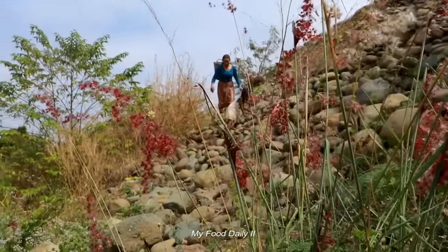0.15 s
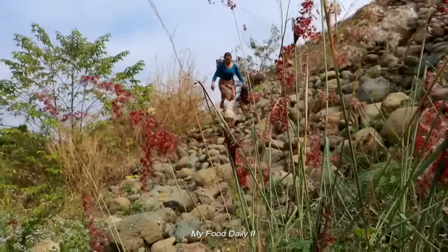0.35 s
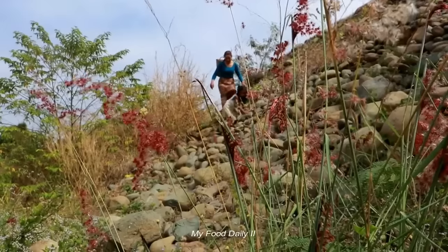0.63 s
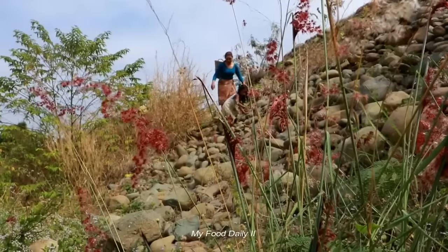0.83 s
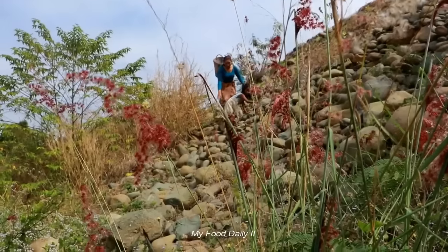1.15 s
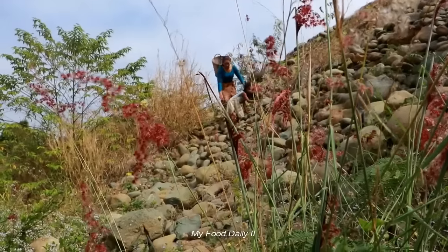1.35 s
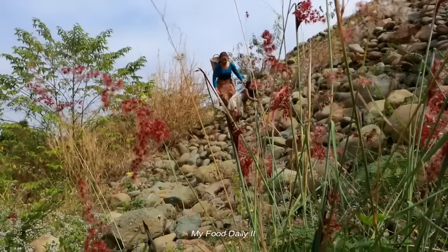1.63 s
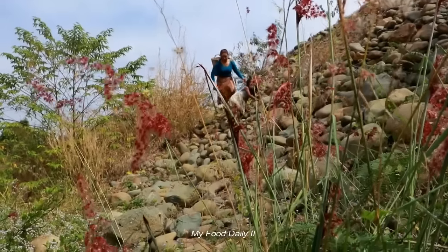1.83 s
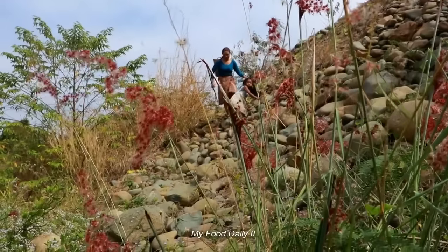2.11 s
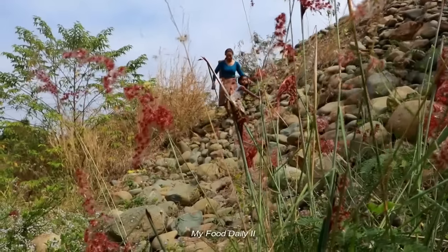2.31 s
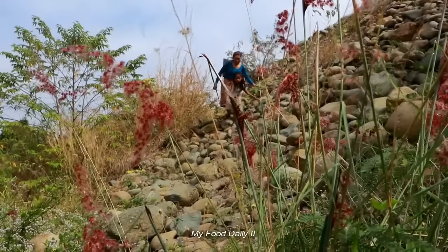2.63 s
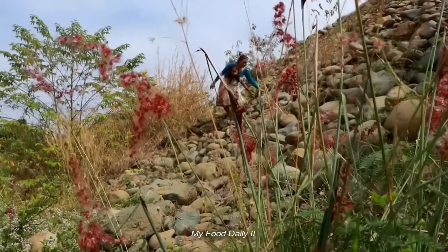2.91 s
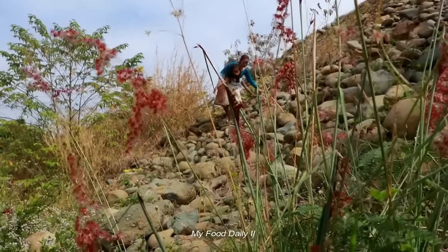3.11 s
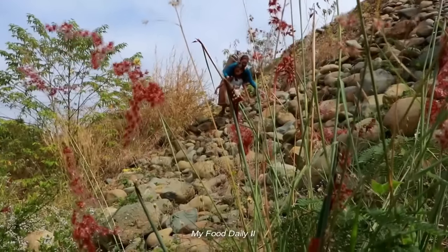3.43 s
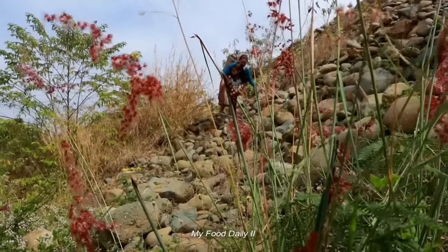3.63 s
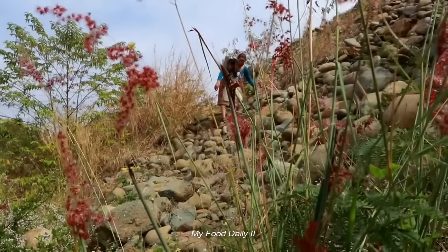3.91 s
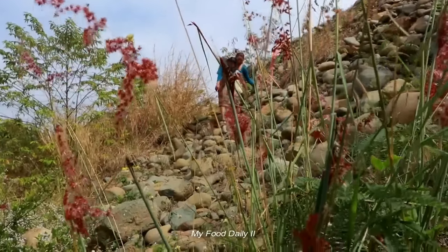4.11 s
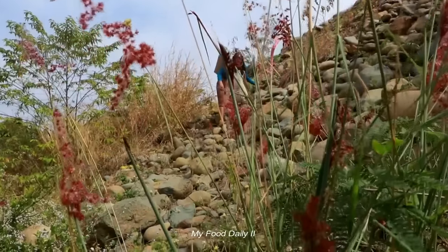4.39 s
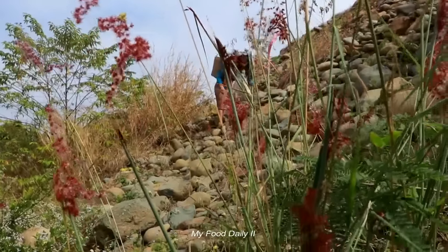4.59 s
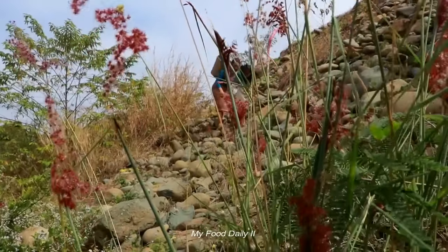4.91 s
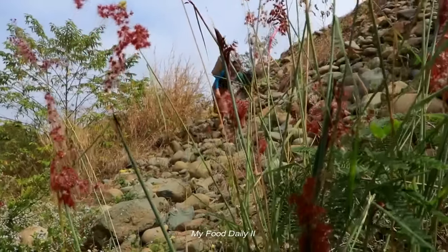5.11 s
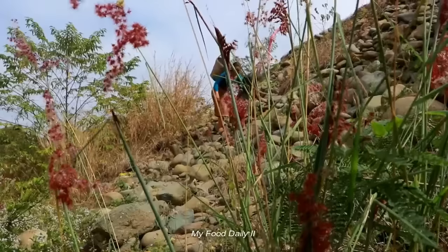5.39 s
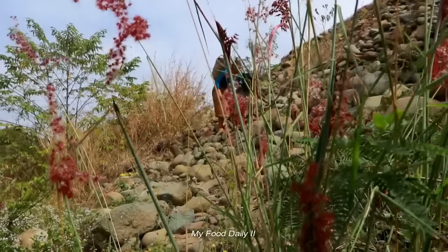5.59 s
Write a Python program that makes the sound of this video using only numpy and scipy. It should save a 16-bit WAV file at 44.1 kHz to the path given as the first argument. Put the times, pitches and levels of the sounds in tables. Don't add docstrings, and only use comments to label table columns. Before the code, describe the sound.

Outdoors on a stony slope, a cricket trills over a faint engine hum and airy rush. Soft steps knock stones, snap dry stems and a strap squeaks. After a lull with swishing grass and bird whistles, a stumble cracks stones loudly together near three seconds, then quieter steps, gravel crunches and more knocks follow. The stones sound dry and clear, with only a short scattered echo and light microphone hiss.

```python
import sys
import numpy as np
from scipy import signal
from scipy.fft import rfft, irfft, next_fast_len
from scipy.io import wavfile
from scipy.ndimage import map_coordinates

SR = 44100
rng = np.random.default_rng(int(sys.argv[2]) if len(sys.argv) > 2 else 0)


def bounce(signal):
    frames = np.transpose(np.atleast_2d(signal))
    limited = np.clip(frames, -1, 1)
    pcm = np.round(limited * 32767).astype(np.int16)
    wavfile.write(sys.argv[1], SR, pcm)


def undo_db(level):
    steps = np.asarray(level, float) / 20
    return 10 ** steps


N = 253575
T = np.arange(N) / SR


def unit(x):
    return x / np.sqrt(np.mean(x ** 2) + 1e-20)


def curves(rows):
    s, *columns = np.transpose(rows)
    return [np.interp(T, s, column) for column in columns]


def wobble(rate, size=N):
    knots = rng.standard_normal(int(size * rate / SR) + 4)
    return map_coordinates(knots, [T[:size] * rate])


def coloured(x, points):
    f, db = np.transpose(points)
    m = next_fast_len(N + 8192)
    log_hz = np.log(np.fft.rfftfreq(m, 1 / SR) + 1)
    gain = undo_db(np.interp(log_hz, np.log(f + 1), db))
    return unit(irfft(rfft(x, m) * gain, m)[:N])


def ring(hz, t60, t):
    return np.sin(2 * np.pi * np.minimum(hz, 20000) * t) * undo_db(-60 * t / t60)


def resonate(x, hz, width_hz):
    f = np.fft.rfftfreq(8192, 1 / SR)
    response = 1j * f * width_hz / (hz * hz - f * f + 1j * f * width_hz)
    y = irfft(rfft(x, 8192) * response ** 2)[:4096]
    return y / np.abs(y).max()


def add(track, s, x):
    part = track[round(s * SR):][:len(x)]
    part += x[:len(part)]


def echoes(x, db, t60):
    t = np.arange(SR // 8) / SR
    slope = rng.standard_normal(len(t)) * undo_db(-60 * t / t60)
    return x + undo_db(db) * signal.fftconvolve(x, slope / np.linalg.norm(slope))[:N]


def contacts(u, spread_s, dense, lead=0.48):
    v = np.arange(u.shape[1]) / SR / max(spread_s, 1e-4)
    touches = (u[0] < dense) * (2 * u[1] - 1)
    swell = np.minimum(0.47 + 2 * v, 1)
    return touches * swell * np.exp(-v * np.sqrt(v)) + lead * (v == 0)


def strokes(rows):
    fade_db = 9
    return np.sqrt(sum(undo_db(db - fade_db * np.abs(T - s) / half) ** 2 for s, half, db in rows))


def grit(per_s, spread_db, clump_db, bed):
    hits = (rng.random(N) < per_s / SR) * rng.choice([-1, 1], N) * undo_db(spread_db * rng.random(N))
    clumps = undo_db(clump_db * np.tanh(wobble(60)))
    return unit(hits) * clumps + bed * rng.standard_normal(N)


def whistle(rows, flutter_db, waver_hz, partials, ripple=0):
    ripple_per_s, ripple_hz, ripple_db = 29, 140, 1.5
    s, hz, db = np.transpose(rows)
    t = np.arange(s[0], s[-1], 1 / SR)
    gate = np.clip(np.minimum(t - s[0], s[-1] - t) / 0.0031, 0, 1)
    sag = ripple * (.5 - (ripple_per_s * (t - s[0] - .023).clip(0)) % 1)
    pitch = np.interp(t, s, hz) + ripple_hz * sag + waver_hz * wobble(109.5, size=len(t))
    phase = 2 * np.pi * np.cumsum(pitch) / SR
    flutter = flutter_db * wobble(140.6, size=len(t))
    level = gate * undo_db(np.interp(t, s, db) + 6.0 + ripple_db * sag + flutter)
    out = np.zeros(N)
    add(out, s[0], level * sum(undo_db(g_db) * np.sin(k * phase) for k, g_db in partials))
    return out


def notes(songs):
    return [[(s + a * length, hz + b * (turn_hz - hz), db + c) for a, b, c in shape]
            for shape, rows in songs for s, length, hz, turn_hz, db in rows]


def valley():
    # time in seconds, pitch in Hz, level in dB.
    engine = [(0.0, 82, -54), (1.47, 85, -57.5), (1.9, 78, -49.5), (2.3, 82.3, -53.5), (2.55, 71.5, -52),
              (2.7, 72, -48), (2.93, 75, -55), (3.12, 81, -50.5), (4.55, 82.5, -49.5), (5.14, 81.6, -50.5),
              (5.75, 78.3, -50)]
    # frequency in Hz, level in dB per Hz.
    rumble_colour = [(14, -24), (24, -9), (34, -8), (50, -5.5), (85, -7), (120, -9), (177, -6), (230, -15),
                     (400, -21.5), (600, -42)]
    air_colour = [(150, -54), (250, -4), (460, -0.5), (1160, -5.5), (1420, -2), (1730, -6.5), (3650, -11),
                  (5250, -14.5), (6140, -8), (6820, -12), (9300, -14.5), (10300, -17.5), (16000, -19)]
    hz, db = curves(engine)
    phase = 2 * np.pi * np.cumsum(hz + 1.8 * wobble(17)) / SR
    octave = undo_db(-17.0 + 4.5 * wobble(6)) * np.sin(2 * phase)
    hum = undo_db(db + 2.0 + 1.5 * wobble(8.6)) * (np.sin(phase) + octave)
    rumble = undo_db(-51.5 + wobble(1.71)) * coloured(rng.standard_normal(N), rumble_colour)
    air = undo_db(-55.0 + 0.78 * wobble(1.28)) * coloured(rng.standard_normal(N), air_colour)
    return hum + rumble + air


def cricket():
    # time in seconds, level in dB, lead of the stroke in cycles, pitch shift in Hz,
    # low end of the stroke against its start in dB.
    trill = [(0, -60.5, -0.39, 0, 0), (0.64, -58.5, -0.46, 0.5, -1), (0.67, -98, -0.47, 2, 0),
             (1.75, -99, -0.47, -300, 0), (1.8, -64, -0.5, -300, 0), (1.95, -67, -0.51, -200, 1),
             (2.2, -58, -0.38, -120, -2), (2.9, -57, -0.35, -20, -4), (3.2, -58.5, -0.31, -0.5, -4.5),
             (4.1, -57.5, -0.28, 0.5, -5), (4.5, -60, -0.18, 20, -8), (4.9, -58, -0.24, 20, -6),
             (5.7, -60.5, -0.32, 25.5, -4)]
    strokes_hz = 41.5
    db, lead, shift, low_db = curves(trill)
    u = (strokes_hz * T + lead + .4) % 1 - .4

    def bump(at, width):
        return np.exp(-.5 * ((u - at) / width) ** 2)

    def tone(hz):
        return np.sin(2 * np.pi * np.cumsum(hz + shift + 20 * wobble(150)) / SR)

    swell = bump(-0.12, .11) + undo_db(low_db + wobble(30)) * bump(0.14, 0.094)
    stroke = swell * tone(6800 - 190 * np.tanh((u - .01) / 0.12))
    answer = 0.33 * bump(0.22, 0.12) * tone(6900)
    near = echoes(undo_db(db + 11 + wobble(45)) * (stroke + answer), -11, .03)
    far = coloured(rng.standard_normal(N), [(5400, -47), (5900, -9), (6200, -2), (6700, -42)])
    blur = coloured(rng.standard_normal(N), [(6200, -45), (6600, 2), (6950, -3), (7300, -48)])
    return near + undo_db(db - 4.0) * blur + undo_db(-73) * far


def birds():
    # share of the length, share of the way from first to turning pitch, level in dB.
    glide = [(0, 0.044, -1), (.3, 0.16, 4), (.8, .82, 3.5), (1, 0.97, -3)]
    swing = [(0, 0, 4), (.35, .82, 2), (.5, 0.99, 1.5), (.65, .78, 2.3), (1, -.1, 2)]
    hook = [(0, 0, -9), (.07, 0.48, -8.5), (.14, 0.656, -8), (.165, .96, -2), (.75, .72, -2.5),
            (.92, .58, -7.5), (1, .3, -8)]
    dip = [(0, 0.051, 1), (.35, .7, 3), (.6, 0.96, 3), (1, .85, -7)]
    arch = [(0, 0, -2), (.2, .35, 2), (.55, .72, 3), (1, 1, -2)]
    # start in seconds,
    # length in seconds, first pitch in Hz, turning pitch in Hz, level in dB.
    glide_notes = [(0.16, 0.17, 1716, 2650, -63), (0.49, 0.041, 9440, 9150, -57.5),
                   (0.503, 0.06, 6750, 7550, -61), (0.764, 0.095, 4490, 4200, -60.5),
                   (1.549, 0.09, 3200, 3500, -62), (1.668, 0.054, 3210, 3600, -62),
                   (1.787, 0.053, 6200, 7050, -58.5), (3.292, 0.069, 3360, 3500, -60.5),
                   (3.711, 0.037, 4270, 3330, -62), (5.335, .035, 4100, 3020, -65),
                   (5.43, .05, 7000, 7700, -66)]
    swing_notes = [
        (1.33, 0.24, 3570, 3730, -68.5),
        (3.55, 0.22, 6720, 5160, -59.5),
        (3.752, .058, 3420, 3720, -62),
        (5.29, 0.21, 6760, 5200, -60.5),
    ]
    hook_notes = [
        (2.137, 0.14, 3660, 4560, -45.5),
        (3.35, 0.14, 3500, 4570, -45),
        (4.154, 0.16, 3690, 4530, -47.5),
        (5.515, 0.15, 3655, 4415, -47),
    ]
    dip_notes = [
        (.29, .13, 6650, 5850, -58.5),
        (1.66, .155, 6670, 5600, -56),
    ]
    arch_notes = [
        (.9, .125, 4350, 5850, -61),
        (3.147, .125, 4450, 5950, -62.5),
        (3.6, .06, 4350, 4150, -68),
        (4.265, .025, 2950, 3150, -62),
    ]
    near_songs = notes([(hook, hook_notes)])
    far_songs = notes([(glide, glide_notes), (swing, swing_notes), (dip, dip_notes), (arch, arch_notes)])
    near = sum(whistle(rows, 1.8, 30, [(1, -2)], ripple=1) for rows in near_songs)
    far = sum(whistle(rows, 2, 26, [(1, -5)]) for rows in far_songs)
    echo_s, echo_db = .036, -10
    far = far + undo_db(echo_db) * np.roll(far, round(echo_s * SR))
    return echoes(near, -6, .14) + echoes(far, -4, .12)


def basket():
    # time in seconds, pitch of the high partial in Hz, level in dB.
    squeaks = [
        [(0.49, 15818, -73), (0.502, 15701, -55), (0.572, 15236, -59), (0.632, 15200, -59), (0.64, 15050, -58),
         (0.704, 15100, -59), (0.94, 14771, -67)],
        [(5.41, 15500, -73), (5.42, 15300, -56), (5.542, 15100, -63), (5.545, 15080, -71)],
    ]
    # start in seconds, pitch in Hz, level in dB, time to die by 60 dB in seconds.
    clinks = [(.492, 4430, -46, 0.091), (.56, 7700, -47, 0.1), (.58, 7750, -48, .05), (.64, 7700, -48, .07),
              (4.361, 7600, -46, 0.097), (4.797, 11840, -49, 0.064), (4.843, 8900, -42, 0.06),
              (4.855, 8900, -34, 0.05), (5.056, 8970, -39.5, 0.045), (5.04, 8950, -52, .05),
              (5.41, 4380, -49, 0.81), (5.475, 7630, -51.5, 0.075)]
    out = sum(whistle(rows, 4, 45, [(1, -2), (3 / 4, -15)]) for rows in squeaks)
    t = np.arange(SR // 8) / SR
    ends = (1 - np.exp(-t / 0.00082)) * np.clip((t[-1] - t) / 0.021, 0, 1)
    for s, hz, db, t60 in clinks:
        add(out, s, undo_db(db + 3.1 * wobble(200, size=len(t))) * ring(hz, t60, t) * ends)
    return out


def scraping():
    # pitch in Hz, level in dB.
    sizes = [(200, -3), (370, -3), (700, -3), (1100, -2), (1600, -7.5)]
    # time of most weight in seconds, half length in seconds,
    # grinding level in dB, fine grit against it in dB.
    treads = [(0.01, 0.24, -56, -2.5), (0.463, 0.079, -56.5, -17), (0.87, 0.15, -56, 1),
              (1.407, 0.4, -65.5, 0), (2.025, 0.13, -55, -6), (2.306, 0.15, -58, -2),
              (2.46, 0.051, -67.5, 13), (2.666, 0.085, -48, -6.5), (2.872, 0.14, -47, -6),
              (3.206, 0.45, -63.5, -3), (3.52, 0.19, -59.5, -8.5), (3.904, 0.12, -57.5, -8),
              (4.066, 0.075, -46, -17), (4.18, 0.049, -49, -4), (4.384, 0.15, -47, -9.5),
              (4.8, 0.14, -51.5, -3.5), (5.076, 0.063, -51.5, -7), (5.337, 0.091, -55.5, -8),
              (5.75, 0.19, -54.5, -8)]
    # middle in seconds, half length in seconds, level in dB.
    swishes = [(.13, 0.25, -59), (.76, 0.21, -56.5), (1.7, 0.1, -54.5), (1.95, 0.19, -61),
               (2.2, 0.23, -58.5), (2.51, 0.19, -55), (2.88, 0.16, -52.5), (3.36, 0.14, -61),
               (3.85, 0.14, -67), (4.3, 0.34, -65.5), (5.5, .25, -66)]
    # frequency in Hz, level in dB per Hz.
    grass_colour = [(2650, -29), (4500, -5), (6300, -5), (8700, 0), (9500, -4.5), (10400, -12.5),
                    (14500, -8), (16000, -25)]
    weight = strokes([(s, half, db) for s, half, db, _ in treads])
    crush = strokes([(s, half, db + grit_db) for s, half, db, grit_db in treads])

    def stone(hz):
        colour = [(hz / 2, -30), (hz / 1.3, -4), (hz, 0), (hz * 1.3, -4), (hz * 2, -30), (hz * 8, -70)]
        return coloured(grit(500, 12, 5, bed=.5), colour)

    grind = unit(sum(undo_db(db) * stone(hz) for hz, db in sizes))
    fine_colour = [(1200, -24), (1900, -7.5), (2800, -6.5), (4000, -9.5), (6000, -16.5), (16000, -31)]
    fine = crush * coloured(grit(2000, 6, 3.5, bed=0.52), fine_colour)
    brush = strokes(swishes) * coloured(grit(1200, 8.8, 7.6, bed=0.66), grass_colour)
    return undo_db(3.5) * (weight * grind + fine + brush)


def snaps():
    # start in seconds, peak level in dB, colour in Hz, level of the lower crack in dB.
    breaks = [(0.0383, -44, 7970, -56), (0.1575, -39, 8070, -57), (0.4943, -37, 9480, -57),
              (1.746, -38, 9790, -45), (2.0976, -41, 8560, -58), (2.1306, -46, 7970, -39),
              (2.1666, -45, 8460, -40.5), (2.196, -40.5, 8660, -36), (2.2467, -27.5, 11100, -24),
              (2.436, -28, 5430, -35), (2.559, -49, 7500, -53), (2.585, -25, 11500, -28),
              (2.614, -27, 12600, -48), (2.7771, -33, 9280, -48), (2.9148, -48, 7790, -57),
              (2.9427, -40, 7930, -54), (2.995, -19, 9000, -44), (3.042, -41, 8520, -34),
              (3.2797, -29.5, 13000, -31.5), (3.3453, -28.5, 8240, -60), (3.8347, -43, 8050, -59),
              (3.8606, -37, 7600, -61), (3.894, -36, 9100, -54), (4.1579, -45, 7640, -57),
              (4.766, -39, 9000, -47), (4.842, -33, 8940, -34), (4.924, -41, 8900, -59),
              (5.0574, -41, 8990, -58)]
    out = np.zeros(N)
    for (s, db, hz, low_db), u in zip(breaks, rng.random((len(breaks), 2, 1024))):
        crackle = contacts(u, 0.0035, dense=0.4) + (T[:1024] == 0)
        bright = undo_db(db - 5.0) * resonate(crackle, hz, 0.36 * hz)
        low = undo_db(low_db - 2.5) * resonate(crackle, 3770, 4800)
        add(out, s - .0004, bright + low)
    return out


def gravel():
    # start in seconds, peak level in dB, colour in Hz.
    grains = [(2.599, -33, 1030), (2.617, -27, 900), (2.631, -39, 695), (2.654, -37, 1400),
              (2.671, -41, 1530), (2.686, -39, 1400), (2.711, -38, 1400), (2.835, -31, 1130),
              (2.901, -33, 1350), (2.911, -35, 1300), (2.938, -42, 1040), (2.957, -40, 662),
              (3.007, -17.5, 1250), (4.044, -40, 947), (4.061, -35, 729), (4.104, -38, 681),
              (4.154, -39, 1200), (4.171, -39, 929), (4.207, -40, 834), (4.255, -42, 1030),
              (4.304, -39, 1030), (4.374, -40, 1130), (4.399, -36, 1350), (4.411, -39, 1100),
              (4.425, -36, 1110), (4.436, -35, 1100), (4.447, -36, 1040), (4.471, -45, 1300),
              (5.11, -42, 573), (5.297, -37, 1440), (5.364, -38, 807)]
    # start in seconds, peak level in dB, colour in Hz.
    cracks = [(.671, -34, 1500), (.91, -34, 1500), (2.4342, -27, 2600), (2.8275, -28, 1700),
              (2.8712, -16.5, 1500), (3.0026, -10, 2600), (4.088, -21, 1250), (4.2945, -37, 1100),
              (4.329, -18, 1190), (4.8005, -21, 1700), (4.966, -35, 1000), (5.0605, -29.5, 1000)]
    out = np.zeros(N)
    for rows, wide in (grains, .45), (cracks, 1.5):
        for (s, db, hz), u in zip(rows, rng.random((len(rows), 2, 512))):
            cushion = np.hanning(round(.55 * SR / hz))
            blow = np.convolve(contacts(u, .0012, dense=.05, lead=1.6), cushion)
            add(out, s - .0003, undo_db(db - 4) * resonate(blow, hz, wide * hz))
    return out


def pebbles():
    # start in seconds, peak level in dB, pitch in Hz, swell in seconds,
    # time to die by 60 dB in seconds.
    pings = [(.669, -24.5, 1355, 0.0025, 0.018), (.678, -39, 1410, 0.0018, 0.037),
             (.685, -32.5, 1390, .003, .025), (0.6942, -33, 1300, 0.0019, 0.051),
             (2.4345, -30.5, 3870, 0.00092, 0.018), (2.434, -36, 3190, 0.00092, 0.03),
             (2.589, -29, 3180, .002, 0.023), (2.59, -38, 4270, .001, .02),
             (2.869, -23, 804, 0.0009, 0.022), (2.869, -28, 2800, .0005, .015),
             (3.004, -33, 4340, .0005, 0.036), (4.33, -25.5, 730, 0.0009, 0.037),
             (4.799, -26, 1950, 0.00078, 0.018), (2.579, -39.5, 174.4, 0.043, 0.51),
             (2.872, -18.5, 1412, 0.0016, 0.052), (3.0025, -23, 1910, 0.00048, 0.019),
             (3.0025, -21, 2770, 0.00044, 0.019), (3.0025, -17.5, 3650, 0.00063, 0.018),
             (3.035, -42, 1200, 0.0018, 0.032), (4.18, -44, 2490, .002, .03),
             (4.80, -27.5, 323, .002, 0.11), (4.803, -33, 2410, .002, .03), (4.843, -33, 209, .003, 0.085),
             (4.848, -36, 3490, .001, 0.017)]
    out, t = np.zeros(N), T[:SR // 3]
    for s, db, hz, swell_s, t60 in pings:
        swell = 1 - np.exp(-(t / max(swell_s, 1e-4)) ** 2)
        shape = ring(hz, t60, t) * swell * undo_db(1.3 * wobble(218, size=len(t)))
        add(out, s, undo_db(db) * shape / np.abs(shape).max())
    return out


def slides():
    # start in seconds, length in seconds, colour in Hz, level in dB, width over colour.
    slips = [(.672, 0.038, 790, -50, 0.57), (.965, 0.056, 2700, -54.5, 0.23),
             (.99, 0.065, 2080, -58.5, .25), (2.595, 0.026, 860, -41.5, 1), (2.982, 0.0187, 2600, -39.5, 1),
             (5.068, 0.007, 1840, -43, .6), (4.395, 0.069, 1080, -47, 0.37), (3.8, 0.086, 4100, -66, 0.74),
             (4.793, 0.03, 690, -40.5, 1), (4.846, .016, 810, -40, 1), (4.58, .04, 2600, -58, .5),
             (2.645, 0.087, 1450, -50, .6), (3.6, 0.043, 2500, -62.5, 0.76)]
    out = np.zeros(N)
    for s, length, hz, db, wide in slips:
        stroke = np.sin(np.pi * np.clip(T[:4000] / length, 0, 1)) ** .5
        rough = rng.standard_normal(4000) * stroke * undo_db(3 * wobble(150, size=4000))
        add(out, s, undo_db(db + 13.0) * resonate(rough, hz, wide * hz))
    return out


def knocks():
    # start in seconds, peak level in dB, ring in Hz, chip level in dB,
    # time to die by 60 dB in seconds.
    loose = [(0.094, -29.5, 1420, -54, 0.029), (0.670, -36, 1010, -39, 0.03), (0.937, -39, 1940, -49, .018),
             (2.4348, -25, 1840, -28, 0.016), (2.591, -25, 3160, -25.5, 0.028),
             (2.828, -25, 1074, -50, 0.066), (2.8692, -13.5, 1400, -37, 0.015),
             (2.8714, -8, 1380, -50, 0.022), (3.0026, -12.5, 1430, -14.5, 0.025),
             (3.026, -23.5, 1320, -30, 0.036), (3.871, -32.5, 1110, -53, 0.035),
             (4.33, -23, 870, -48, 0.014), (4.893, -32.5, 1170, -56, 0.03), (4.965, -35, 925, -61, 0.035),
             (4.989, -34.5, 1080, -64, 0.025), (5.411, -31.5, 1860, -35, 0.022)]
    # start in seconds, peak level in dB, ring in Hz, chip level in dB.
    bedded = [(0.492, -31, 1910, -37), (0.804, -47, 1210, -52), (0.826, -35.5, 740, -38),
              (0.832, -39, 1130, -55), (0.891, -34, 1930, -35.5), (0.909, -29, 1790, -42),
              (0.913, -31.5, 1060, -48), (2.359, -42, 697, -53), (2.559, -44, 1100, -39),
              (2.61, -29.5, 1040, -44), (2.70, -36.5, 1210, -48), (2.767, -34.5, 1030, -58),
              (2.808, -40, 1900, -44.5), (2.889, -29, 1460, -33), (2.9932, -27, 1360, -34),
              (3.199, -45, 1370, -57), (3.961, -30, 1060, -66), (4.077, -35, 950, -60),
              (4.088, -26, 1420, -56), (4.296, -33, 1090, -55), (4.195, -36, 1310, -52),
              (4.342, -31, 1100, -55), (4.354, -37, 1300, -52), (4.46, -37, 1320, -59),
              (4.685, -42, 1300, -52), (4.762, -36, 1130, -40), (4.799, -17, 1410, -26.5),
              (4.840, -33, 1300, -42), (4.843, -21.5, 1090, -28.5), (4.886, -33.5, 1480, -43),
              (5.056, -34, 905, -55), (5.06, -26.5, 930, -37.5), (5.291, -33.5, 1080, -59),
              (5.339, -35.5, 1040, -51), (5.355, -33.5, 1790, -44), (5.541, -39, 1940, -43)]
    # start in seconds, peak level in dB, ring in Hz, chip level in dB.
    heels = [
        (0.957, -39, 2450, -37.5),
        (2.297, -44, 805, -56),
        (3.443, -43, 1310, -45),
        (4.143, -44, 1040, -52),
        (4.165, -39.5, 921, -48),
    ]
    loose_thud_db, bedded_thud_db, heel_thud_db = -26.5, -13, -1
    bedded_t60_s = 0.032
    rows = [(*row, loose_thud_db) for row in loose]
    rows += [(*row, bedded_t60_s, bedded_thud_db) for row in bedded]
    rows += [(*row, bedded_t60_s, heel_thud_db) for row in heels]
    return sorted((s, db, hz, db + thud_db, chip_db, t60) for s, db, hz, chip_db, t60, thud_db in rows)


def stones():
    out = np.zeros(N)
    blow_list = knocks()
    for (s, db, hz, thud_db, chip_db, t60), u in zip(blow_list, rng.random((len(blow_list), 2, 2048))):
        t60 = np.clip(t60, .006, .12)
        hit = contacts(u, 0.091 * t60, dense=0.13, lead=2.14)
        rattle = 0.18 * contacts(u[:, ::-1], 0.64 * t60, dense=.15)
        blows = np.convolve(hit + rattle, np.hanning(20))
        body = 0.45 * resonate(blows, hz, 9 / t60) + 0.14 * resonate(blows, 1.28 * hz, 9 / t60)
        body = body + 0.87 * resonate(blows, 0.9 * hz, 1.0 * hz)
        thud = resonate(blows, 268, 197)
        edge = contacts(u[::-1], 0.24 * t60, dense=.25, lead=1.6)
        chip = resonate(np.convolve(edge, np.hanning(11)), 2790, 1930)
        add(out, s - .0006, undo_db(db + 1.5) * body + undo_db(thud_db + 6.0) * thud + undo_db(chip_db) * chip)
    return out


def scene():
    mono = valley() + cricket() + birds() + basket() + scraping() + snaps()
    mono = mono + gravel() + gravel()
    mono = mono + pebbles() + slides() + stones()
    return np.array([mono, mono])


def top_cut(x):
    return signal.sosfilt(signal.butter(12, 16660, fs=SR, output="sos"), x)


def record(dry):
    # frequency in Hz, level in dB per Hz.
    hiss_colour = [(25, -8), (59, -18), (100, -6), (381, -3.5), (452, -3), (1250, -6.5), (5530, -4),
                   (16000, -7)]
    hiss = undo_db(-63.5) * coloured(rng.standard_normal(N), hiss_colour)
    edge = np.interp(np.fft.rfftfreq(N, 1 / SR), [15700, 15830], [1, undo_db(-30)])
    mix = irfft(rfft(dry + [hiss, -hiss]) * edge, N)
    return top_cut(mix)


dry = scene()
out = record(dry)
bounce(out)
```